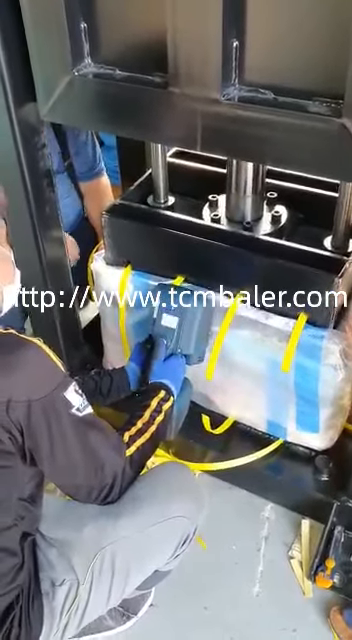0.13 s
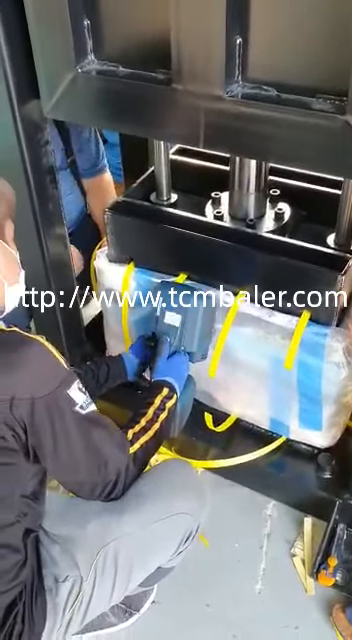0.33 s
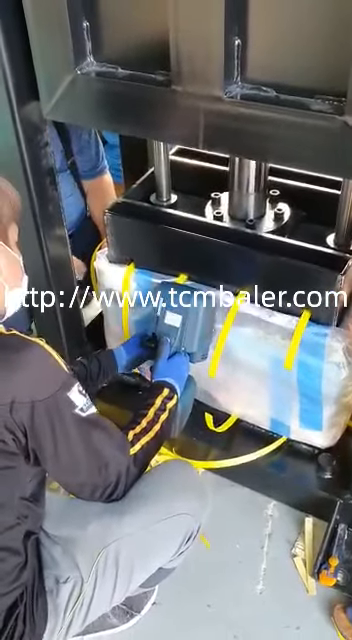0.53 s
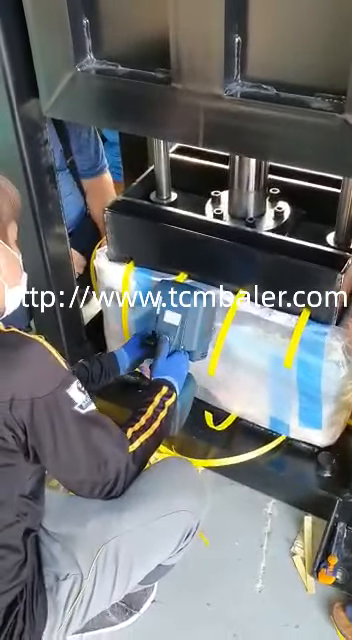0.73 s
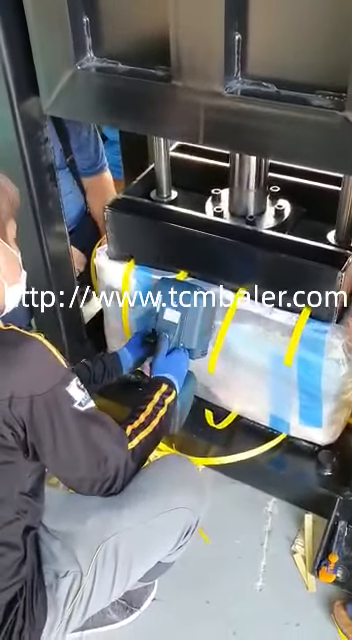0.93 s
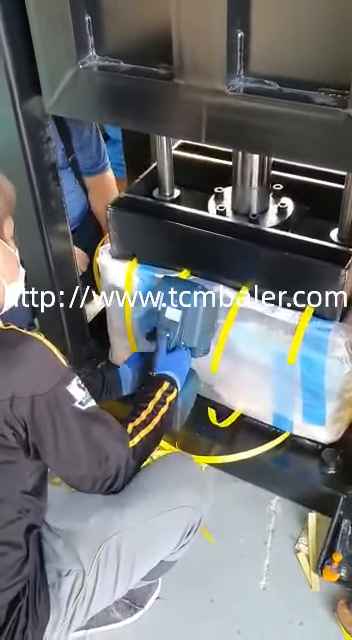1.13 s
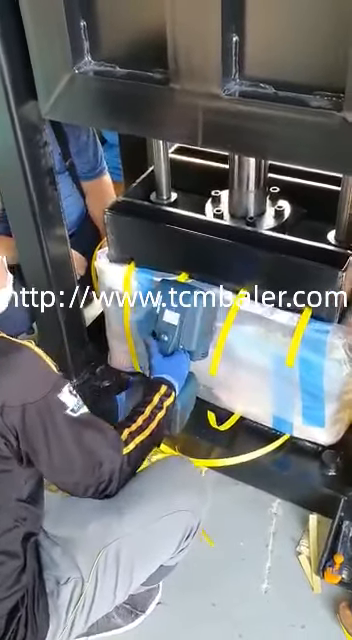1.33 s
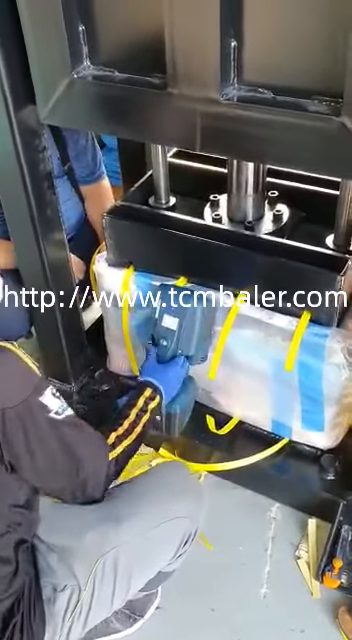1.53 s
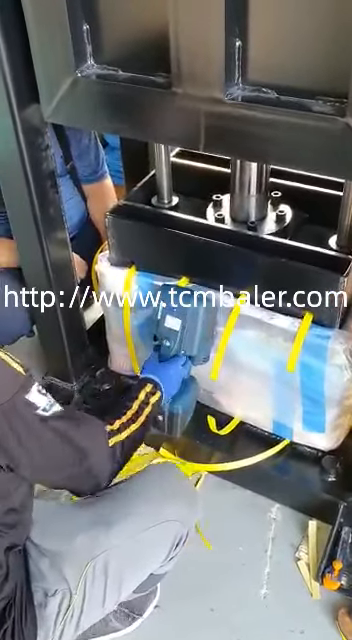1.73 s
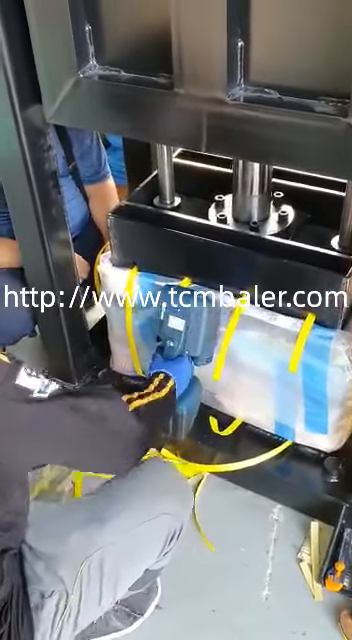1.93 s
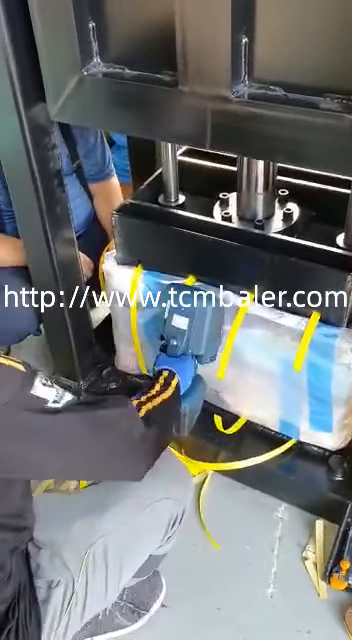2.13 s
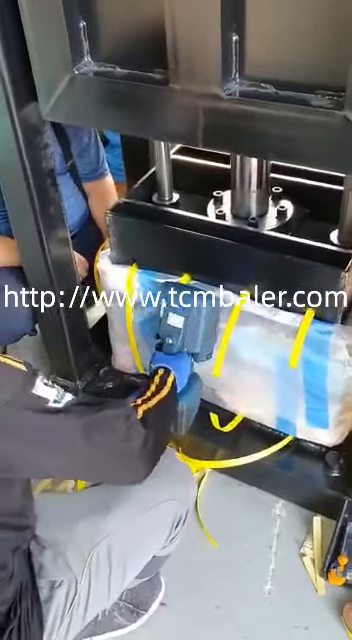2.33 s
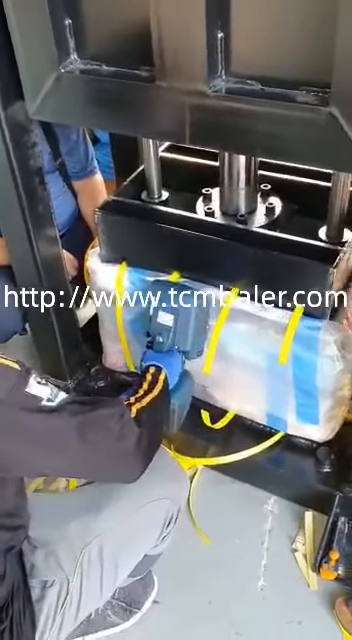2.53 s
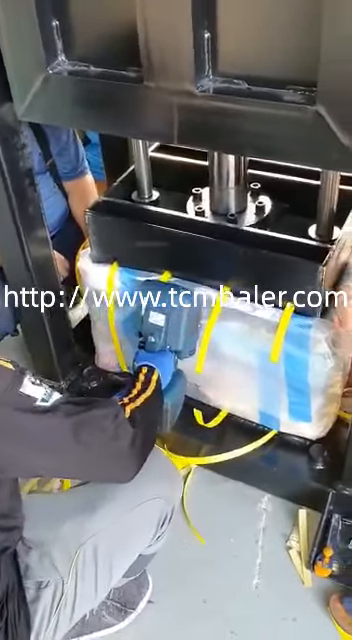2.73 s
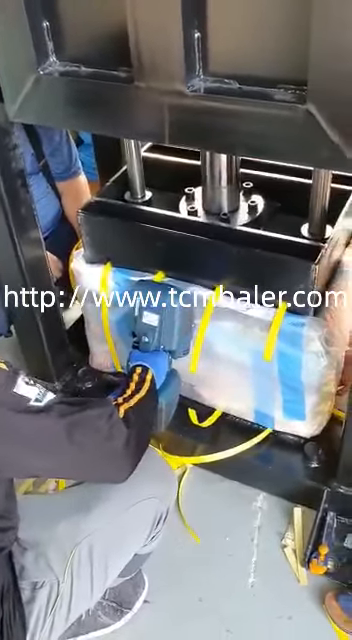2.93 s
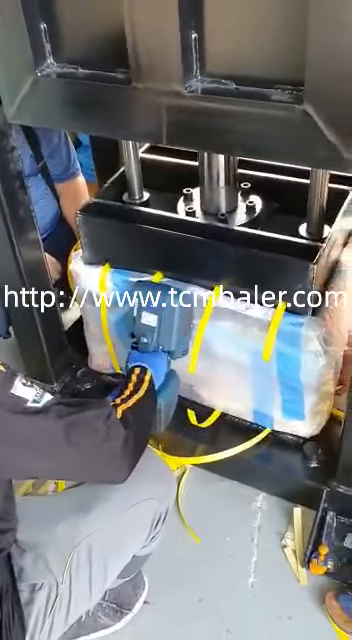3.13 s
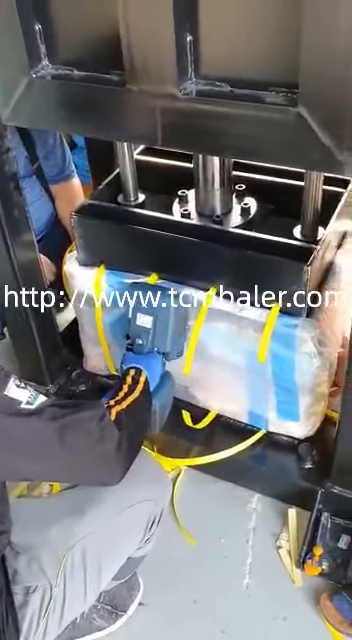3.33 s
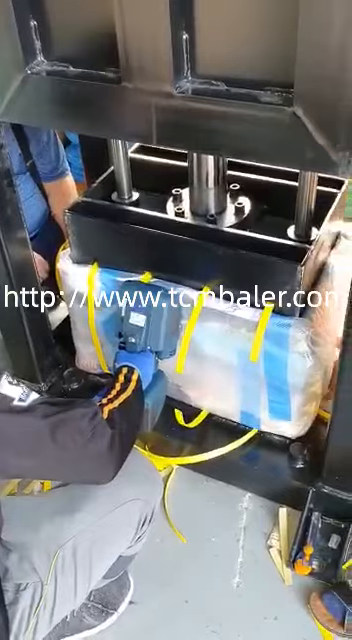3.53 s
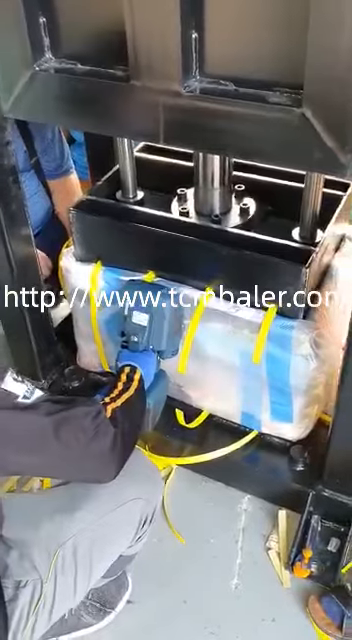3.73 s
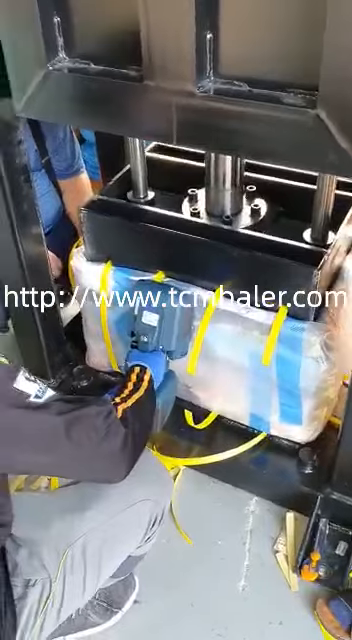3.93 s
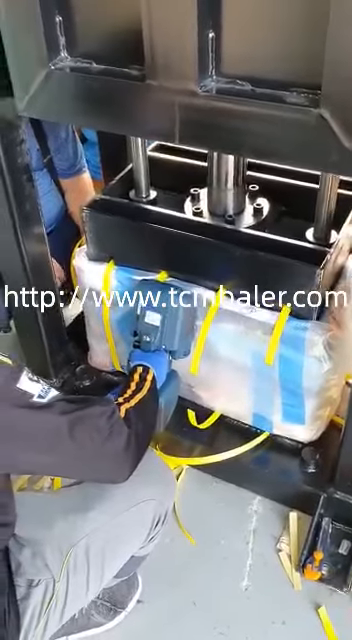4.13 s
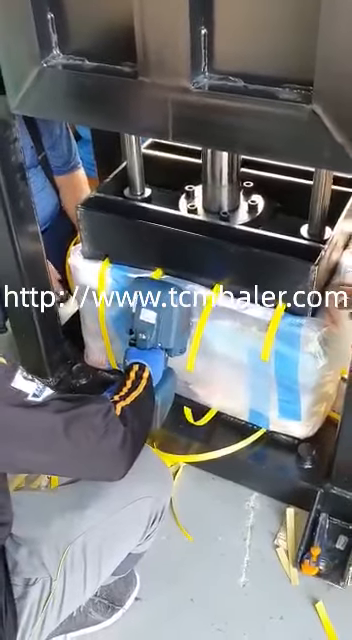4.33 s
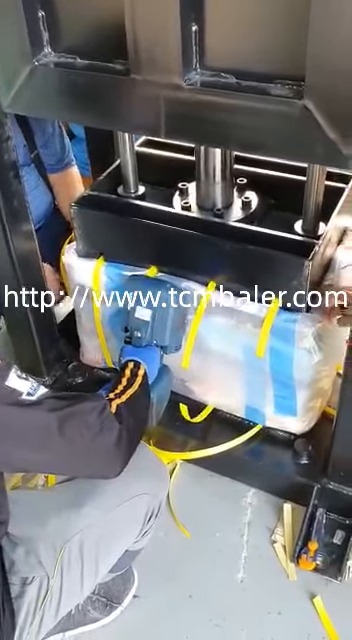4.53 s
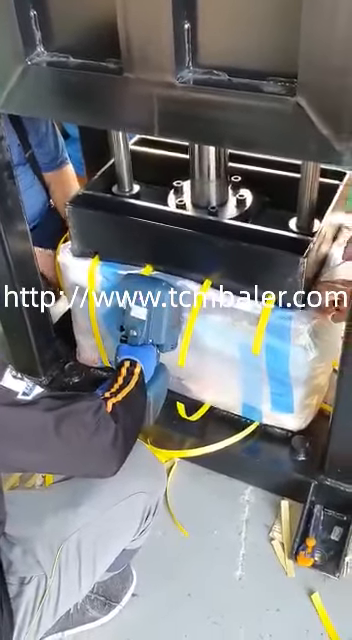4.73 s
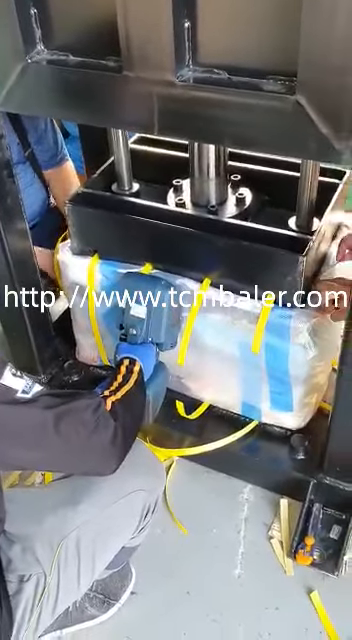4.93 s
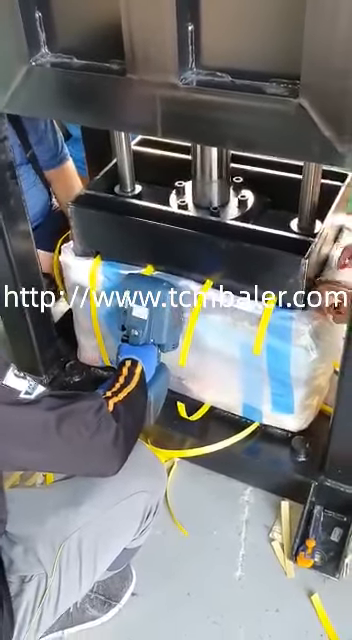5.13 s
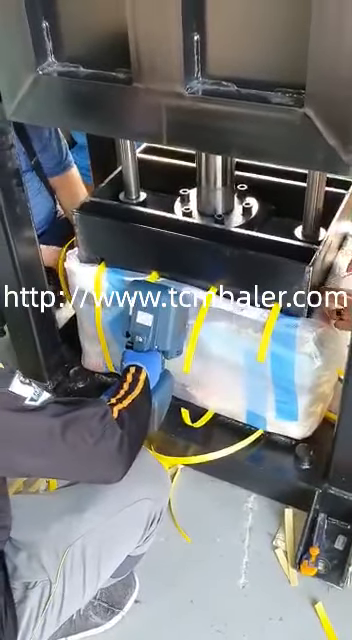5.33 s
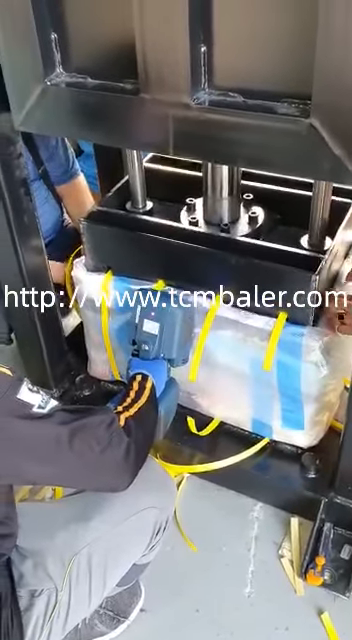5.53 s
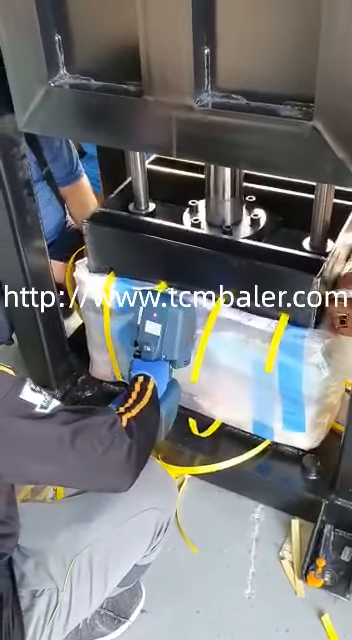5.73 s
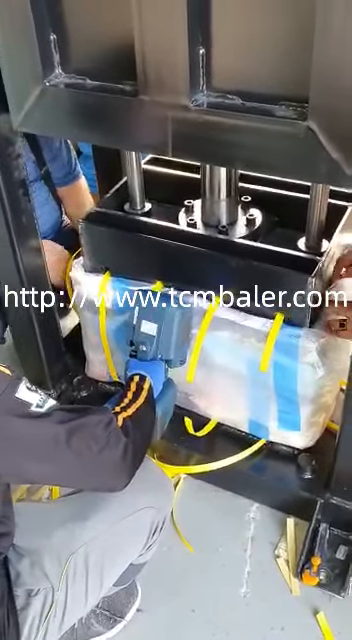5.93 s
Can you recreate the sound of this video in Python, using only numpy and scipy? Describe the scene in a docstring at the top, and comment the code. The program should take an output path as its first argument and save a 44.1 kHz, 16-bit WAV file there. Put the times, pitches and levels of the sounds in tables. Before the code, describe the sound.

Close by in a slightly reverberant workshop, the geared motor of a strapping tool whines twice, sagging the second time as the taut plastic strap rings. The latch clicks and the tool welds the strap for about two seconds: first a hard drone, then a thinner, brighter buzz, then a rattling drone with knocks from its housing. It cuts off, leaving small clicks and faint crinkling over a low machine hum.

```python
"""In a workshop, over distant machines, a battery strapping tool straps a pressed bale.
Its geared motor runs twice; in the second run it sags as the plastic strap tightens and sings.
The latch clicks, the housing knocks and the welding shoe shakes on the strap: a hard drone while
it grips, a bright buzz as it slides, a rattling drone as the strap melts. A few clicks follow."""
import sys
import numpy as np
from scipy import signal
from scipy.fft import rfft, irfft
from scipy.io import wavfile
from scipy.ndimage import uniform_filter1d

SR = 44100
rng = np.random.default_rng(int(sys.argv[2]) if len(sys.argv) > 2 else 0)


def unload_audio(sound):
    """Save the sound as a 16-bit wav file, at the path given as the first command line argument."""
    columns = np.transpose(np.atleast_2d(sound))
    # keep every value between -1 and 1, then stretch to whole-number steps
    steps = np.round(np.clip(columns, -1, 1) * 32767)
    wavfile.write(sys.argv[1], SR, steps.astype(np.int16))


N = 268569
T, HZ = np.arange(N) / SR, np.fft.rfftfreq(N, 1 / SR)
MID_HZ, TREBLE_HZ, FULL_HZ = (1500, 3200), (3500, 12000), (20, 16000)


def amp(db):
    """Decibels to gain."""
    return 10 ** (np.asarray(db) / 20)

def unit(x):
    """Scales to rms 1."""
    return x / np.sqrt(np.mean(x ** 2) + 1e-20)

def since(start_s):
    """Seconds since a moment, zero before it."""
    return np.maximum(T - start_s, 0)

def ramp(centre_s, length_s):
    """Linear step from 0 to 1."""
    return np.clip((T - centre_s) / length_s + .5, 0, 1)

def settle(start_s, tau_s):
    """Exponential rise from 0 to 1."""
    return 1 - np.exp(-since(start_s) / tau_s)

def swell(peak_s, half_s):
    """Gaussian bump of height 1."""
    return np.exp(-np.minimum(((T - peak_s) / half_s) ** 2, 20))

def noise():
    """Two independent white noises."""
    return rng.standard_normal((2, N))

def wander(rate_hz):
    """Low-passed noise of rms 1."""
    real, imag = rng.standard_normal((2, len(HZ)))
    return unit(irfft((real + 1j * imag) / (1 + (HZ / rate_hz) ** 4), N))

def lookup(points, hz=HZ):
    """Interpolates a table on a log frequency axis."""
    knots_hz, values = np.transpose(points)
    return np.interp(np.log(hz + 1), np.log(knots_hz + 1), values)

def colour(x, gain):
    """Filters by a gain per frequency."""
    return irfft(rfft(x) * gain, N)

def stereo(pair, spectrum_db, coherence, band_hz):
    """Colours and partly correlates two signals; their mean has rms 1 within the band."""
    shared = np.clip(lookup(coherence), 0, 1)
    left, other = rfft(pair)
    ears = np.array([left, shared * left + np.sqrt(1 - shared ** 2) * other]) * amp(lookup(spectrum_db))
    centre = ears.mean(0)[(HZ > band_hz[0]) & (HZ < band_hz[1])]
    return irfft(ears, N) * N / np.sqrt(2 * np.sum(abs(centre) ** 2))

def impulses(turns):
    """One unit impulse per turn, split between adjacent samples."""
    whole = np.diff(np.floor(turns), prepend=0)
    late = np.clip(turns % 1 / np.maximum(np.gradient(turns), 1e-9), 0, 1)
    return whole * (1 - late) + np.roll(whole * late, -1)

def add(mix, start_s, sound):
    """Mixes a sound in at a moment."""
    part = mix[round(start_s * SR):][:len(sound)]
    part += sound[:len(part)]

def resonate(x, hz, width_hz):
    """Unity-gain resonance that follows a pitch curve."""
    carrier = np.exp(2j * np.pi * np.cumsum(hz) / SR)
    pole = np.exp(-np.pi * width_hz / SR)
    return 2 * (carrier * signal.lfilter([(1 - pole) ** 2], [1, -2 * pole, pole ** 2], x / carrier)).real


# Background wash. Each row: frequency in Hz, relative level in dB.
WASH_DB = [(15, -30), (25, -18), (54, -0.5), (118, -8), (150, -4.5), (202, -13), (243, -4), (326, -14.5),
           (529, -10.5), (655, -11), (1000, -13.5), (1540, -13.5), (1760, -14), (3180, -26.5), (15000, -52)]
# Each row: frequency in Hz, left-right coherence.
WASH_COHERENCE = [(100, 0.96), (400, 0.91), (1000, 0.12), (3000, 0.075)]
# Each row: frequency in Hz, level in dB.
HUM_LINES = [(98, -51.5), (156, -53), (243, -54.5)]
# Each row: peak time in seconds, half length in seconds, level in dB.
THROB_SWELLS = [(1.3, 0.51, -51), (5.27, 0.37, -44.5)]

def workshop(wash_db=-42, throb_hz=51.7):
    """Distant machines: an even wash, a wavering hum and a low throb that swells twice."""
    wash = amp(wash_db) * stereo(noise(), WASH_DB, WASH_COHERENCE, FULL_HZ) * amp(.54 * wander(32))
    throb = sum(amp(db) * swell(peak_s, half_s) for peak_s, half_s, db in THROB_SWELLS)
    lines = [(hz, amp(db)) for hz, db in HUM_LINES] + [(throb_hz, throb)]
    return wash + sum(gain * amp(2 * wander(.82)) * np.sin(2 * np.pi * hz * T + wander(15))
                      for hz, gain in lines)


# Each row: switch-on, switch-off and braking times in seconds, free shaft speed in Hz, gain in dB.
MOTOR_RUNS = [(-.2, 0.069, 0.223, 658.2, -1), (0.403, 1.161, 1.156, 638.7, -1)]
TAUT_S, SAG_HZ = .65, 170

def motor_motion(attack_s=.032, coast_hz_per_s=450, coast_db_per_s=56, brake_db_per_s=620):
    """Shaft speed, load and gain: the motor spins up, sags as the strap tightens, coasts and brakes."""
    load = np.minimum(since(TAUT_S) / (MOTOR_RUNS[-1][1] - TAUT_S), 1)
    shaft_hz, gain = np.zeros((2, N))
    for on_s, off_s, brake_s, free_hz, db in MOTOR_RUNS:
        lag_hz = 89.9 * (1 - settle(on_s, .03))
        run_hz = free_hz - lag_hz - SAG_HZ * load - coast_hz_per_s * since(off_s)
        shaft_hz = np.where(T >= on_s, np.maximum(run_hz, free_hz / 2), shaft_hz)
        fade_db = coast_db_per_s * since(off_s) + brake_db_per_s * since(brake_s)
        gain += np.minimum(since(on_s) / attack_s, 1) * amp(db - fade_db)
    return shaft_hz, load, gain

# Each row: frequency in Hz, left-right coherence (negative counts as 0).
TOOL_COHERENCE = [(500, 0.75), (1200, 0.31), (3000, 0), (6000, 0.19), (14000, -0.5)]

def partial(turns, hz, waver, in_phase_below_hz=1100):
    """A tone of wavering level; high ones differ in phase between the ears."""
    coherence = np.clip(lookup(TOOL_COHERENCE, hz), 0, 1)
    apart_rad = np.arccos(coherence) * rng.choice([-1, 1]) * (hz > in_phase_below_hz)
    phase = 2 * np.pi * (turns + rng.random())
    knots_s = np.arange(0, T[-1] + 1, .035)
    sway = [1 + waver * np.interp(T, knots_s, rng.standard_normal(len(knots_s))) for ear in range(2)]
    return np.sqrt(2) * np.cos([phase, phase + apart_rad]) * sway

# Each entry: share of full load.
LOAD_STEPS = [0, .15, .85, 1]
# Each row: multiple of the shaft speed, then relative level in dB at each load step.
MESH_ORDERS = [(1, -0.5, -5, -8, -9), (1.98, -17, -11, -16, -20), (2.72, -0.5, 0.5, -8, 5.5),
               (2.95, -8, -4, -14, -12), (4.34, -28, -18, -8, -6), (5.44, -16, -3, -16, -8)]

def gear_whine(turns, slow_turns, load, roughness=.3, chop=.25):
    """Rough shaft and mesh tones, chopped once per turn of a slower gear."""
    loaded_hz = MOTOR_RUNS[-1][3] - SAG_HZ
    tones = sum(amp(np.interp(load, LOAD_STEPS, db)) * (1 + roughness * wander(70))
                * partial(order * turns, order * loaded_hz, waver=.35) for order, *db in MESH_ORDERS)
    level_db = np.interp(load, [0, 1], [-34.5, -35.5])
    return amp(level_db) * tones * (1 + chop * np.cos(2 * np.pi * slow_turns))

def tooth_impacts(turns, life_s, decay_s=.016, whitening=.7):
    """Each turn repeats a burst of impacts; six patterns crossfade as the contact shifts."""
    hits = impulses(turns)
    decay = np.exp(-T[:900] / decay_s)
    out = np.zeros((2, N))
    for pattern in range(6):
        age = (T / life_s - pattern + 3) % 6 - 3
        share = np.cos(np.pi / 2 * np.clip(age, -1, 1))
        spectrum = rfft(decay * rng.standard_normal((2, len(decay))))
        burst = irfft(spectrum / abs(spectrum) ** whitening)
        out += signal.oaconvolve([hits * share], burst, axes=1)[:, :N]
    return out

# Gear noise, free and loaded. Each row: frequency in Hz, relative level in dB.
FREE_GEAR_DB = [(400, -82), (640, -6.5), (800, -15.5), (980, -25), (1250, -25), (1800, -11.5),
                (2700, -20.5), (3300, -18.5), (4000, -24.5), (8300, -20.5), (9700, -43), (11600, -31),
                (15500, -35.5)]
LOADED_GEAR_DB = [(240, -70), (400, -58), (496, -16), (560, -5), (873, -4.5), (972, -14), (1360, -2.5),
                  (1930, -36), (2090, 2.5), (3360, -9.5), (5560, -8), (7440, -7.5), (8150, -6),
                  (9790, -17.5), (15500, -23)]

def gear_noise(grit, load):
    """Tooth noise changes colour and grows with load."""
    free = amp(-39.5) * stereo(grit, FREE_GEAR_DB, TOOL_COHERENCE, TREBLE_HZ)
    loaded = amp(-33.5) * stereo(grit, LOADED_GEAR_DB, TOOL_COHERENCE, TREBLE_HZ)
    return np.sqrt(1 - load) * free + load ** 1.8 * loaded

# Strap and frame resonances. Each row: frequency in Hz, width in Hz, relative level in dB.
STRAP_MODES = [(631, 50, 1), (2120, 130, 8.5), (2620, 260, -5), (4330, 700, -11), (5600, 560, -5),
               (6850, 1100, -6), (8180, 950, -2)]

def strap_singing(grit, load, rise=.03, waver=.007, flicker_db=2.5):
    """The gears excite the taut strap and frame; the pitch rises with tension."""
    tuning = 1 - rise * (1 - load)
    rings = sum(amp(db + flicker_db * wander(22))
                * resonate(grit, hz * tuning * (1 + waver * wander(14)), width_hz)
                for hz, width_hz, db in STRAP_MODES)
    return amp(-28.5) * load ** 1.1 * unit(rings)

def tensioner(gear_ratio=5.5):
    """The geared motor pulls the strap: whine, gritty half-periodic noise and singing."""
    shaft_hz, load, gain = motor_motion()
    turns = np.cumsum(shaft_hz * (1 + .008 * wander(70))) / SR
    slow_turns = turns / gear_ratio
    whine = gear_whine(turns, slow_turns, load)
    teeth = unit(tooth_impacts(slow_turns, life_s=.3))
    grit = unit(teeth + noise()) * amp(1.9 * wander(400))
    return gain * (whine + gear_noise(grit, load) + strap_singing(grit, load))


# Each row: frequency in Hz, relative level in dB, t60 in seconds.
HOUSING_MODES = [(521.3, -10.5, 0.22), (626, 3.5, 0.099), (656.8, 12, 0.048), (692, 3, 0.049)]

def housing_ring(pitch_hz, rise_s=.0089):
    """The small plastic shell rings briefly, without bass, at a pitch set by the spot struck; peak 1."""
    t = T[:SR // 8]
    tuning = pitch_hz / HOUSING_MODES[2][0]
    modes = sum(amp(db - 60 * t / t60_s) * np.sin(2 * np.pi * tuning * hz * t)
                for hz, db, t60_s in HOUSING_MODES)
    band = signal.butter(3, [480, 900], "bandpass", fs=SR, output="sos")
    ring = signal.sosfilt(band, (1 - np.exp(-t / rise_s)) * modes)
    return ring / abs(ring).max()

# Each row: start in seconds, level in dB, pitch in Hz.
HOUSING_KNOCKS = [(.187, -26.5, 714), (1.686, -20.5, 657), (1.809, -18.5, 697), (1.822, -13, 637),
                  (1.834, 1, 670), (2.7, -9, 660), (2.768, -21, 554), (2.91, -8, 653.5), (3.014, -6.5, 661),
                  (3.118, -10.5, 570), (3.174, -11, 666), (3.208, -6.5, 605), (3.308, -10.5, 661),
                  (3.557, -15, 700), (3.66, -19, 650), (3.795, -15, 650), (3.934, -9, 621),
                  (3.966, -7, 638), (3.997, -17, 669), (4.022, -31, 650), (4.191, -27, 591),
                  (4.21, -33, 603)]

def knocks():
    """Single blows ring the housing."""
    out = np.zeros(N)
    for start_s, db, pitch_hz in HOUSING_KNOCKS:
        add(out, start_s, amp(db) * housing_ring(pitch_hz))
    return out

def snap(rise_s):
    """Click envelope: rises to 1, dies a little more slowly."""
    age = T[:SR // 8] / rise_s
    return age * np.exp(1 - age)

# Each row: start in seconds, level in dB, rise time in seconds.
LATCH_STRAP_CLICKS = [(0.237, -54, 0.03), (1.692, -37.5, 0.0012), (1.694, -58, 0.01), (1.81, -37, .002),
                      (1.828, -21, 0.022), (4.187, -36.5, 0.0075), (4.208, -44.5, 0.008),
                      (4.772, -49, 0.0023), (4.78, -60, 0.0087), (5.087, -63, .004), (5.117, -58, 0.009),
                      (5.43, -61, 0.0094), (5.532, -56, 0.0055), (5.937, -54, .003)]
# Each row: frequency in Hz, relative level in dB.
CLICK_SPECTRUM_DB = [(470, -27), (800, -9), (1060, 14), (1300, -7), (1750, 1), (3300, 2.5), (5500, 3.5),
                     (9000, -4), (15500, -11.5)]

def clicks(crinkles_per_s=47, crinkle_db=-60.5, grit_db=3.5):
    """Latch and strap snap in gritty bursts; the wrapped bale crinkles faintly."""
    envelope = np.zeros(N)
    for start_s, db, rise_s in LATCH_STRAP_CLICKS:
        add(envelope, start_s, amp(db) * snap(rise_s))
    crinkles = (rng.random(N) < crinkles_per_s / SR) * rng.random(N)
    envelope += amp(crinkle_db) * signal.oaconvolve(crinkles, snap(.0034))[:N]
    grit = noise() * amp(grit_db * np.clip(wander(1200), -2, 2))
    return envelope * stereo(grit, CLICK_SPECTRUM_DB, TOOL_COHERENCE, FULL_HZ)


SLIDING_REGULARITY = .93  # periodic share while the strap slides
# The strap is gripped, slides, melts. Each row: start in seconds, settling in seconds, drone in dB,
# drone drift in dB per second, rasp in dB, buzz in dB, share of the friction that repeats each stroke.
WELD_STAGES = [(1.807, .02, -1.5, -19.5, -19.5, -27.5, 0.47),
               (2.272, 0.026, -19.5, 0, -21, -27, SLIDING_REGULARITY),
               (3.14, 0.06, -13.5, -4.5, -30, -34, 0.48)]

def weld_stages():
    """Glides between stages: stage index, drone dB, rasp dB, buzz dB, periodic share."""
    state = None
    for stage, (start_s, settling_s, drone_db, drift_db_per_s, *friction) in enumerate(WELD_STAGES):
        drifting_db = drone_db + drift_db_per_s * since(start_s)
        target = np.array(np.broadcast_arrays(stage, drifting_db, *friction))
        state = target if state is None else state + (target - state) * settle(start_s, settling_s)
    return state

# Each row: multiple of the stroke rate, peak time in seconds, half length in seconds, gain in dB.
HARMONIC_SWELLS = [(1, 3.25, .45, 4), (5, 3.1, .17, 8), (9, 3.2, .06, 5), (8, 3.3, .1, 3),
                   (10, 3.88, .15, 3), (11, 3.12, .22, -6), (14, 3.05, .2, -8), (10.5, 3.75, .3, 5),
                   (13.5, 3.75, .35, 13)]

def harmonic_gain(order):
    """Single harmonics swell or sink for a while."""
    return amp(sum(db * swell(peak_s, half_s) for k, peak_s, half_s, db in HARMONIC_SWELLS if k == order))

# Drone per stage. Each entry: relative level in dB of stroke harmonic 1, 2, 3, ..
GRIPPED_DB = [-30.5, -18.5, 10.5, 2.5, -9, -1.5, -3, -2, -7, -11, -3.5, -24, -7, -14, -5.5, -34, -15, -24,
              -35, -21, -35, -19, -11.5]
SLIDING_DB = [-21.5, -17, 9, 0, -5, -0.5, -7.5, 0, 0, -1.5, 5, -2, -25, -2, -12, -4, -17, -10.5, -4, -9,
              -12, -12, -7, -4, -17, -6.5, -11, -30, -6, -20, -9, -9, -20]
MELTING_DB = [-23.5, -31, 6.5, 1, -8.5, -18.5, -7.5, -6.5, -9.5, -10.5, -13, -20, -12, -29, -36, -25, -22,
              -14, -30]

def shoe_drone(turns, stage, wobble, grate_above_hz=2500, screech_hz=5800, screech_width_hz=1200):
    """Stroke harmonics, the upper ones grating; unequal alternate strokes add half orders."""
    spectra = [np.pad(amp(db), (0, len(SLIDING_DB) - len(db)))
               for db in (GRIPPED_DB, SLIDING_DB, MELTING_DB)]
    spectra = np.array([gains / np.linalg.norm(gains[:8]) for gains in spectra])
    screech_db = 4.5 * swell(3.02, .13)  # hardest just before the strap gives
    grate = 1 + .35 * wander(80)
    out = np.zeros((2, N))
    for k, gains in enumerate(spectra.T, 1):
        gain = np.interp(stage, range(len(gains)), gains)
        hz = k * STROKE_HZ[-1][1]
        if hz > grate_above_hz:
            gain *= grate * amp(screech_db * np.exp(-((hz - screech_hz) / screech_width_hz) ** 2))
        out += gain * harmonic_gain(k) * partial(k * turns, hz, waver=min(.04 * k, .7))
        if 3 <= k <= 13:
            out += gain * harmonic_gain(k + .5) * wobble * partial((k + .5) * turns, hz, waver=.3)
    return out

# Each row: frequency in Hz, relative level in dB.
RASP_SPECTRUM_DB = [(210, -75), (350, -32), (466, -22.5), (581, 5), (811, -3), (864, -11), (1110, -6.5),
                    (1480, -5.5), (1630, -1.5), (2200, -9.5), (2670, -18.5), (2980, -28), (4030, -32),
                    (15500, -45)]
# The teeth bite, the strap gives, the shoe grinds to a halt.
# Each row: peak time in seconds, half length in seconds, gain in dB.
RASP_FLARES = [(1.865, .045, 6.5), (3.23, .06, 3), (4.012, .018, 10)]

def shoe_rasp(turns, wobble, rasp_db, hiss_db, grain_db=1.7, crossover_hz=3100):
    """Friction of shoe on strap peaks once a stroke: a grainy rasp with hiss above it."""
    scrape = 1 + .35 * np.cos(2 * np.pi * turns) + wobble * np.cos(np.pi * turns)
    rub = noise() * scrape * amp(grain_db * np.clip(wander(500), -2, 2))
    lowpass = 1 / (1 + (HZ / crossover_hz) ** 8)
    rasp = colour(stereo(rub, RASP_SPECTRUM_DB, TOOL_COHERENCE, MID_HZ), lowpass)
    hiss = colour(stereo(rub, RASP_SPECTRUM_DB, TOOL_COHERENCE, TREBLE_HZ), 1 - lowpass)
    flare_db = sum(db * swell(peak_s, half_s) for peak_s, half_s, db in RASP_FLARES)
    return amp(rasp_db + flare_db) * rasp + amp(hiss_db) * hiss

# Each row: frequency in Hz, relative level in dB.
BUZZ_SPECTRUM_DB = [(2200, -42), (2900, 3), (3500, 1.5), (4200, -3), (5000, 4.5), (5800, -6.5), (7000, -2),
                    (8400, 1), (9300, -8), (15500, -9.5)]

def shoe_buzz(turns):
    """The shoe's teeth strike the strap on every stroke: a bright buzz."""
    return stereo(tooth_impacts(turns, life_s=.17), BUZZ_SPECTRUM_DB, TOOL_COHERENCE, TREBLE_HZ)

def housing_rattle(turns, loose_s=2.66, tight_db=-21, loose_db=-8.2):
    """Both ends of each stroke jolt the housing with random force; it loosens as the strap softens."""
    loose = ramp(loose_s, .08)
    jolts = impulses(2 * turns) * rng.uniform(-1, 1, N)
    chatter = unit(signal.oaconvolve(jolts, housing_ring(635))[:N])
    # The play in the housing bounds its swing.
    chatter = unit(chatter / np.sqrt(1 + uniform_filter1d(chatter ** 2, size=700)))
    return chatter * amp(tight_db * (1 - loose) + loose_db * loose)

# Each row: time in seconds, stroke rate in Hz.
STROKE_HZ = [(1.93, 181.5), (2.13, 181.3), (2.27, 183.2), (2.33, 191.3), (2.39, 194.2), (2.46, 194.9),
             (2.66, 192.8), (2.75, 193.9), (3.05, 196.1), (3.14, 196.4), (3.33, 199.4), (3.56, 197.3),
             (3.68, 198.6), (3.95, 198.5)]
# Unequal alternate strokes. Each row: start in seconds, end in seconds, half-order gain in dB.
STROKE_WOBBLES = [(2.092, 2.268, -6), (3.548, 3.998, -10)]

def welder(on_s=1.807, off_s=3.96, latch_open_s=4.256, drone_fade_db_per_s=377, rub_fade_db_per_s=217):
    """The shoe spins up, shakes on the strap and stops; the drive rubs on until the latch opens."""
    spin = settle(on_s, .0235)
    shaking = spin ** 13 * amp(-drone_fade_db_per_s * since(off_s))
    idle = amp(-21) * (1 - ramp(latch_open_s, .24))
    rubbing = spin ** 2 * np.maximum(amp(-rub_fade_db_per_s * since(off_s)), idle)
    stage, drone_db, rasp_db, buzz_db, periodic = weld_stages()
    wobble = sum(amp(db) * (ramp(start_s, .014) - ramp(end_s, .051))
                 for start_s, end_s, db in STROKE_WOBBLES)
    stroke_hz = spin * np.interp(T, *np.transpose(STROKE_HZ)) * (1 + .0018 * wander(40))
    turns = np.cumsum(stroke_hz) / SR
    rasp = shoe_rasp(turns, wobble, rasp_db, hiss_db=buzz_db + 8)
    buzz = amp(buzz_db) * shoe_buzz(turns)
    drone = amp(drone_db) * (shoe_drone(turns, stage, wobble) + housing_rattle(turns))
    return shaking * drone + rubbing * (np.sqrt(1 - periodic) * rasp + np.sqrt(periodic) * buzz)


# Each row: frequency in Hz, t60 in seconds.
HALL_T60_S = [(300, .35), (700, .4), (1500, .6), (4000, .55), (7000, .3), (14000, .28)]

def hall(x, predelay_s=.004):
    """Diffuse reflections for each ear, every band dying at its own rate."""
    reflections = rng.standard_normal((2, SR)) * (T[:SR] > predelay_s)
    hz, t, bands = signal.stft(reflections, SR, nperseg=256)
    tail = signal.istft(bands * amp(-60 * t / lookup(HALL_T60_S, hz)[:, None]), SR, nperseg=256)[1]
    return signal.fftconvolve(x, tail / np.linalg.norm(tail[0]), axes=1)[:, :N]

# Each row: frequency in Hz, left minus right level in dB.
TOOL_BALANCE_DB = [(60, 8), (99, 8), (160, 11), (270, -7.5), (450, 2), (740, -3), (1220, -0.5), (2010, -4),
                   (3330, 2), (5500, 6), (9080, 13), (15000, 21)]
# Each row: frequency in Hz, phase lead of the left ear in radians.
LEFT_LEAD_RAD = [(250, 0), (550, .95), (780, 1.0), (1500, 0)]

def scene():
    """The tool and its reflections, treble mainly on the left, over the workshop background."""
    tool = tensioner() + welder() + knocks() + clicks()
    tool += amp(-16) * hall(tool)
    balance = amp(np.outer([.5, -.5], lookup(TOOL_BALANCE_DB)))
    balance /= np.sqrt(np.mean(balance ** 2, axis=0))
    lead = np.exp(1j * np.outer([.5, -.5], lookup(LEFT_LEAD_RAD)))
    return colour(tool, balance * lead) + workshop()

def record(dry, threshold_db=-16.5, duck_share=.62, recovery_db_per_s=10, cutoff_hz=15800):
    """Gain control ducks everything at the weld's loud start and recovers slowly; then a low-pass."""
    power_db = 10 * np.log10(abs(uniform_filter1d((dry ** 2).mean(0), size=900)) + 1e-12)
    recovery_db = recovery_db_per_s * T
    held_db = np.maximum.accumulate(power_db + recovery_db) - recovery_db
    over_db = np.maximum(held_db - threshold_db, 0)
    ducked = dry / amp(duck_share * uniform_filter1d(over_db, size=200))
    lowpass = signal.firwin(511, cutoff_hz, window=("kaiser", 9), fs=SR)
    return signal.oaconvolve(ducked, lowpass[None], "same")


dry = scene()
out = record(dry)
unload_audio(out)
```